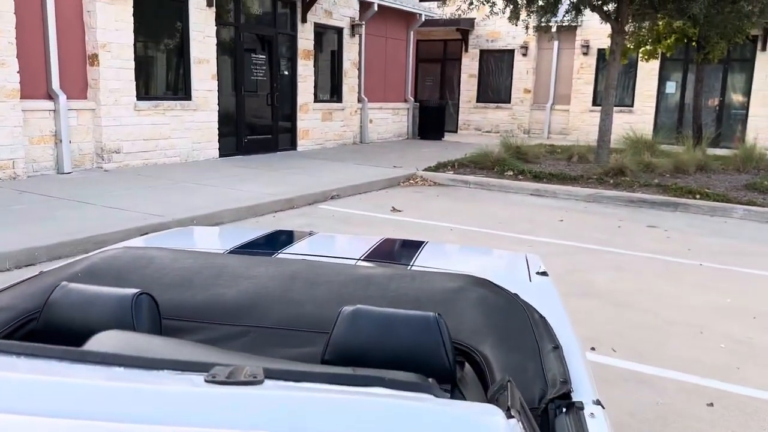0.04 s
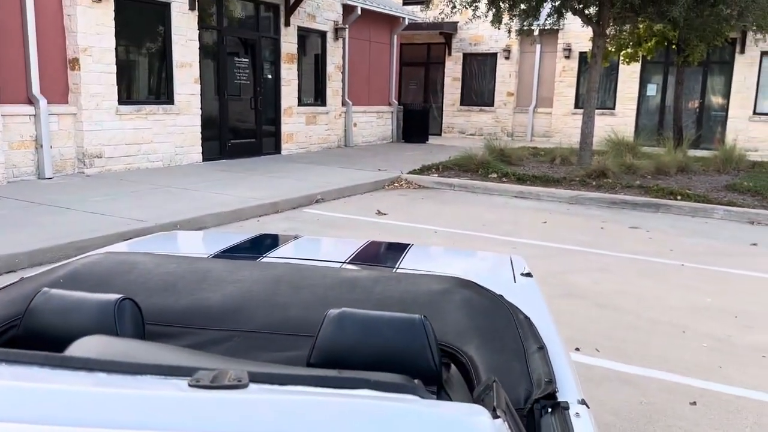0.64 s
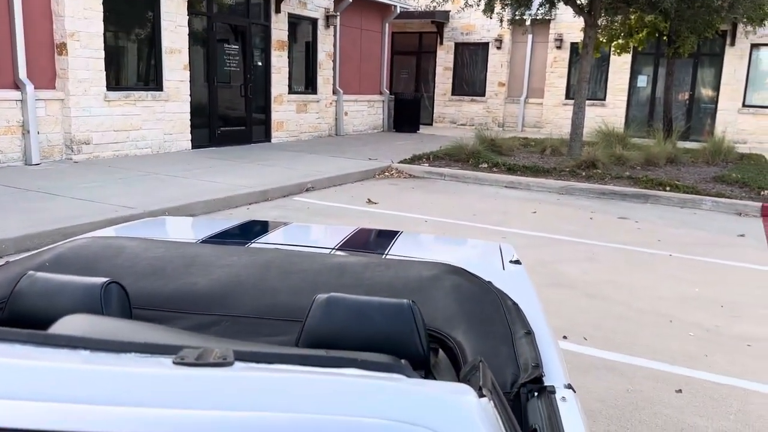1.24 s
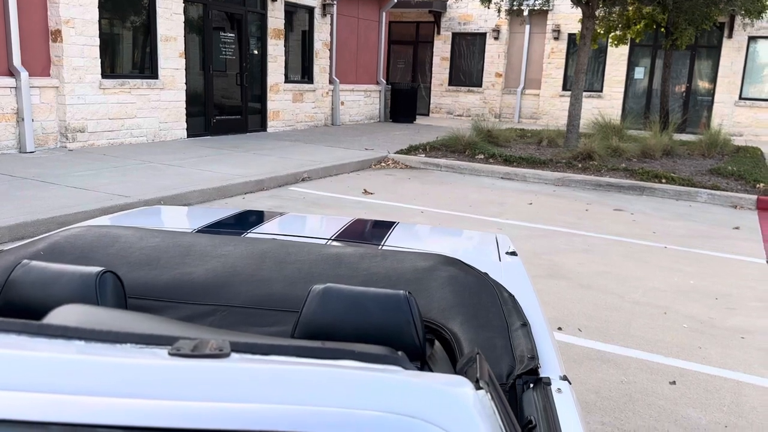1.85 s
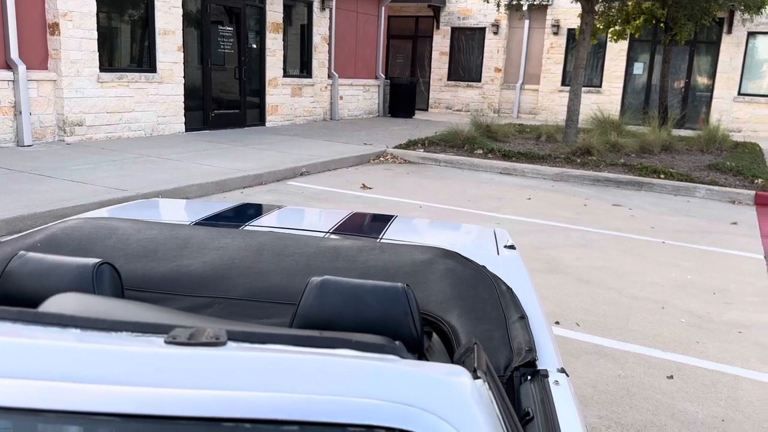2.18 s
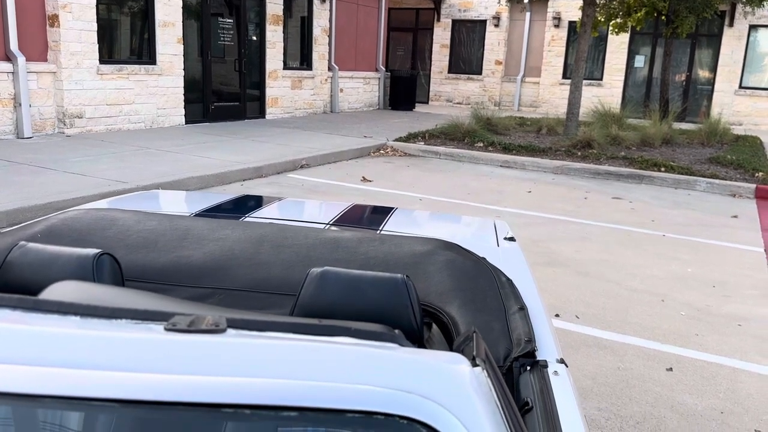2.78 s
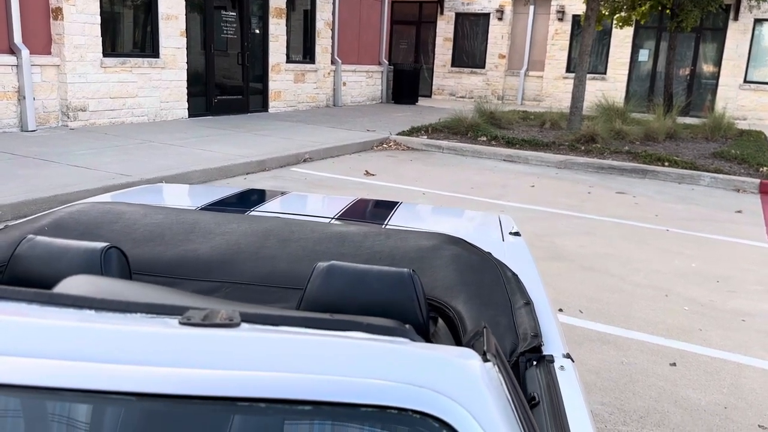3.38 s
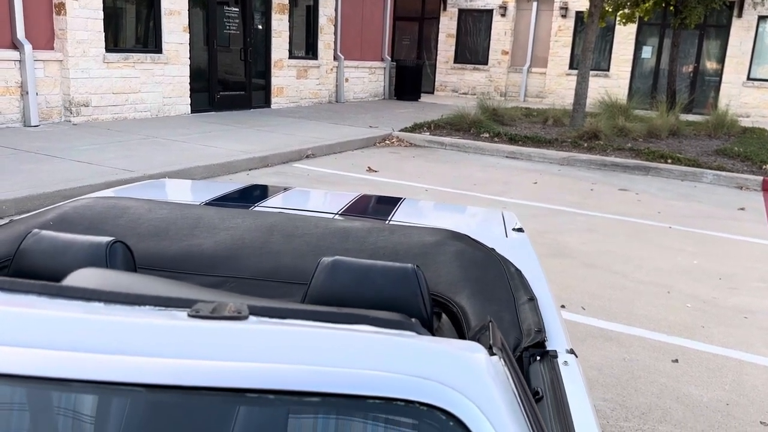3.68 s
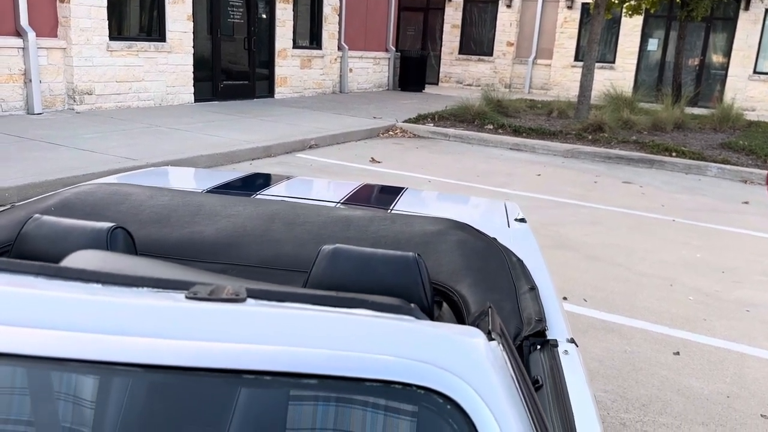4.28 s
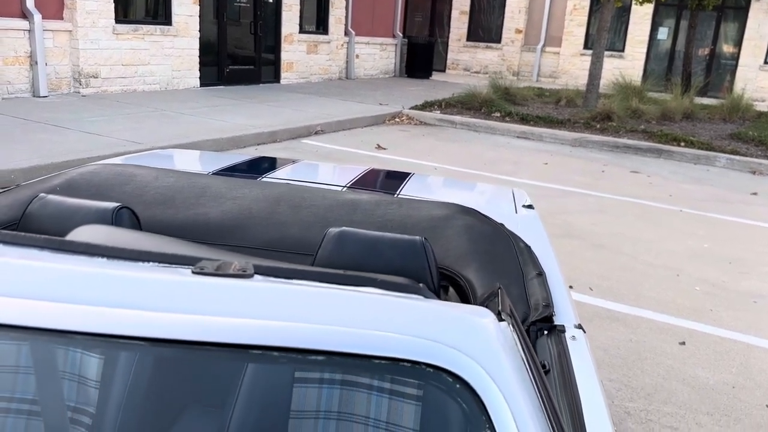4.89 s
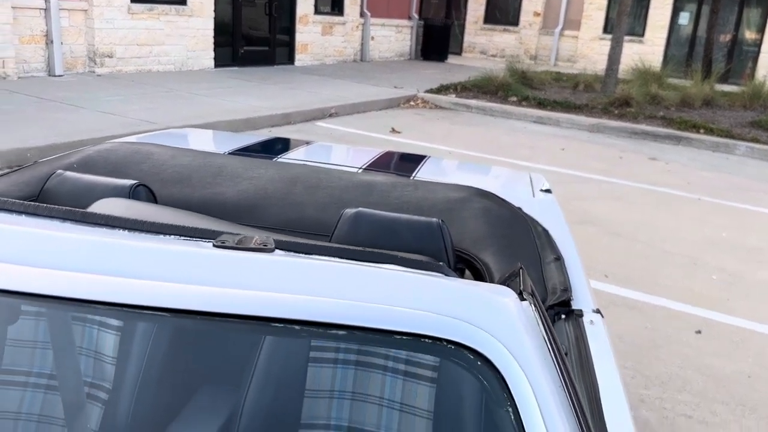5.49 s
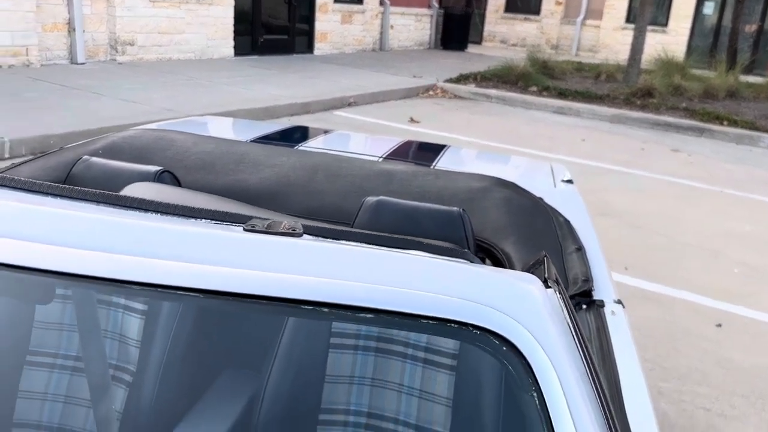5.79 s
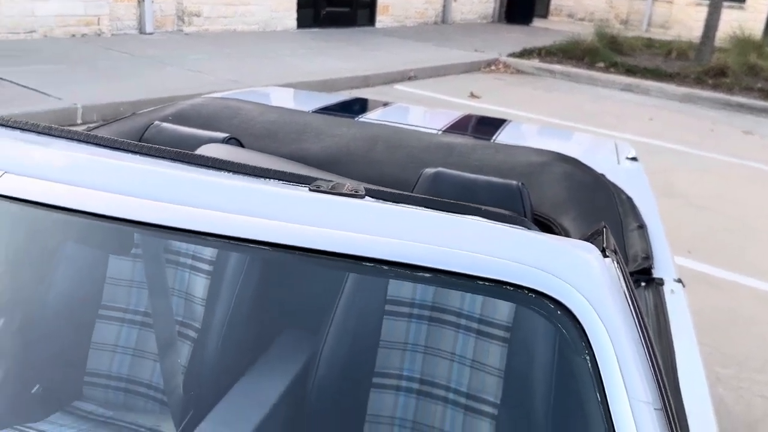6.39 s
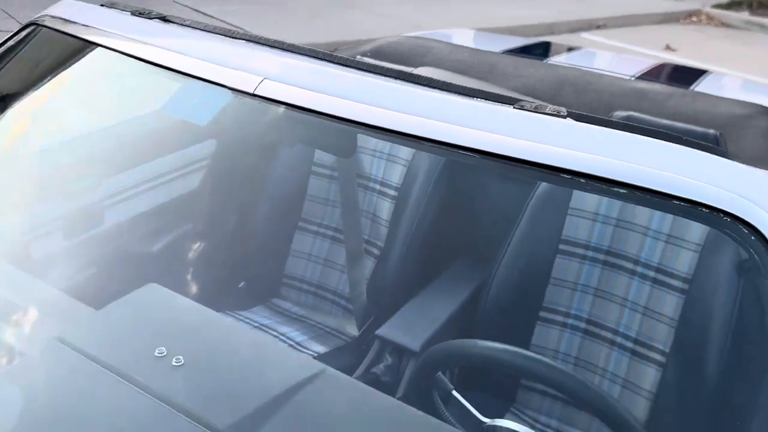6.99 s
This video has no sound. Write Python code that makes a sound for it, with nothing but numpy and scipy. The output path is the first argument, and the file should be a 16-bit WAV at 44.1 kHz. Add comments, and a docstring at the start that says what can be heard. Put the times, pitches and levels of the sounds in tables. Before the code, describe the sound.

A parked convertible's V8 is revved in a parking lot, heard from beside the windscreen. Four quick blips bark from the exhaust, each sinking into a lumpy burble with soft thumps. Fan rush, intake hiss and a whine follow the revs, and the belt gives one brief squeal. The engine falls toward idle, takes two more blips, and the hiss grows at the end.

```python
"""A parked convertible's V8 is blipped six times, heard from beside the windscreen.
Four blips come in the first 4 s: the exhaust barks under throttle, then lopes, burbles and thumps as the
revs sink; a shop front answers. Fan rush, intake hiss and an accessory's whine follow the revs.
The whine swells briefly at 1.2 s, the belt squeals at 2.1 s, the whine swells again at 2.6 s. The engine
falls toward idle, takes two more blips from 5 s on, and the hiss rises as the listener nears the bonnet."""
import sys
import numpy as np
from scipy import signal
from scipy.fft import rfft, irfft, next_fast_len
from scipy.io import wavfile
from scipy.ndimage import uniform_filter1d, minimum_filter1d, map_coordinates

SR = 44100
rng = np.random.default_rng(int(sys.argv[2]) if len(sys.argv) > 2 else 0)


def digitize_waveform(pressure):
    """Quantize a signal to 16-bit integers and store it at the path in sys.argv[1].

    Rows of a 2-D input are taken as channels; values are limited to [-1, 1].
    """
    field = np.atleast_2d(pressure).T
    bounded = np.clip(field, -1, 1)
    quanta = np.round(bounded * 32767).astype(np.int16)
    wavfile.write(sys.argv[1], SR, quanta)


N = 319725
TIME_S = np.arange(N) / SR
CYLINDERS, REV_HZ = 8, 200  # REV_HZ: firing rate at a typical rev

# throttle blips: (opens [s], shut [s], full push [firings/s^2], hiss starts [s], hiss [dB],
#                  load starts [s], load cut [s], bark [dB])
BLIPS = [(0.081, 0.812, 347, 0.26, -30.2, 0.10, 0.79, 1.4),
         (1.404, 1.985, 509, 1.39, -28.3, 1.42, 1.945, 1.5),
         (2.651, 3.053, 391, 2.59, -34.6, 2.69, 3.04, -1.3),
         (3.373, 3.832, 327, 3.35, -34.4, 3.47, 3.78, -2.2),
         (5.154, 5.702, 473, 5.145, -32.6, 5.2, 5.69, -.6),
         (6.13, 6.542, 485, 6.035, -31.8, 6.15, 6.505, 1)]
# exhaust against load: (load [0-1], firing note [dB], bark [dB], burble [dB],
#                        coasting change [dB], drone change [dB])
LOAD = [(0, -42.5, -36.5, -26.5, 1.5, 2), (.15, -23.5, -26, -21, 2, 0.5), (.35, -17, -23.5, -29, 4.5, 5),
        (.55, -18, -19.5, -26.5, -1.5, -6), (1, -20, -16.5, -38, 1, -12)]
# deep note and burble as the listener moves from the tail: (time [s], level [dB])
TAIL_LEVEL = [(0, 2.5), (.5, 2.5), (1.1, 2), (1.6, 1), (2.1, 0), (3.1, -3), (4.3, -2.5), (4.75, -2),
              (5.3, -3), (6.3, -1), (7.25, -1)]


def amp(db):
    """Decibels to gain."""
    return 10 ** (np.asarray(db) / 20)


def unit(x):
    """Scaled to rms 1."""
    return x / np.sqrt(np.mean(x ** 2) + 1e-20)


def along(points, hz):
    """(frequency [Hz], value) points read on a log axis."""
    f, v = np.transpose(points)
    return np.interp(np.log(hz + 1), np.log(f + 1), v)


def lookup(rows, x=TIME_S):
    """Each column after the first, read at x."""
    key, *cols = np.transpose(rows)
    return [np.interp(x, key, c) for c in cols]


def wobble(rate_hz):
    """Smooth random curve, rate_hz knots a second."""
    coarse = np.arange(0, N, 64)
    knots = rng.standard_normal(4096)
    return np.interp(np.arange(N), coarse, map_coordinates(knots, [coarse * rate_hz / SR], mode="wrap"))


def filtered(x, response):
    """x times a complex frequency response."""
    size = next_fast_len(N + SR // 4)
    return irfft(rfft(x, size) * response(np.fft.rfftfreq(size, 1 / SR)), size)[..., :N]


def coloured(x, spectrum):
    """x through (frequency [Hz], level [dB]) points, at rms 1."""
    return unit(filtered(x, lambda hz: amp(along(spectrum, hz))))


def resonate(x, modes):
    """x through (centre [Hz], width [Hz], boost [dB]) resonances."""
    return filtered(x, lambda hz: amp(sum(db / (1 + (2 * (hz - centre) / width) ** 2)
                                          for centre, width, db in modes)))


def rush(spectrum, gate):
    """Gated stereo noise of rms 1, alike in the bass and more diffuse above."""
    coherence = [(130, .995), (300, .92), (620, .42), (900, .7), (1800, .75), (2600, .35), (7500, .3),
                 (10000, .7), (10600, .88)]  # left with right: (frequency [Hz], likeness [0-1])

    def mid_side(hz):
        angle = np.arccos(np.clip(along(coherence, hz), 0, 1)) / 2
        return np.array([np.cos(angle), np.sin(angle)])

    mid, side = filtered(rng.standard_normal((2, N)) * gate, mid_side)
    return coloured(np.array([mid + side, mid - side]), spectrum)


def harmonics(cycle, orders, waver_db, drift_rad):
    """Orders of the four-stroke cycle, each wavering in level and phase."""
    return sum(amp(db + waver_db * wobble(18)) * np.sqrt(2)
               * np.sin(2 * np.pi * (order * cycle + rng.random()) + drift_rad * wobble(15))
               for order, db in orders)


def puffs(cycle, decay_firings, scatter_db):
    """A gate that opens at each firing; the nearer bank's unevenly spaced cylinders are stronger."""
    near_bank = np.array([1, 0, 1, 0, 0, 1, 0, 1])
    firing = cycle * CYLINDERS
    index = firing.astype(int)
    size_db = 4 * near_bank[index % CYLINDERS] + scatter_db * rng.standard_normal(N)[index]
    return unit(amp(size_db) * np.exp(-(firing % 1) / decay_firings))


def crankshaft(start_hz=150.3, idle_hz=34.9, drag_per_s=.64, release_s=.197):
    """Firing rate [Hz]: the throttle pushes it up, drag pulls it toward idle."""
    push = sum(np.interp(TIME_S, [opens, shut - release_s, shut], [0, full, 0])
               for opens, shut, full, *_ in BLIPS)
    fade = np.exp(-drag_per_s * TIME_S)
    return idle_hz + fade * (start_hz - idle_hz + np.cumsum(push / fade) / SR)


def revs_db(firing_hz):
    """Engine speed against a typical rev."""
    return 20 * np.log10(firing_hz / REV_HZ)


def loads(ease_s=.1, eased_to=.46, cut_s=.055):
    """Engine load [0-1], one row per blip: builds, eases, is cut."""
    return np.array([np.interp(TIME_S, [start, cut - cut_s - ease_s, cut - cut_s, cut],
                               [0, 1, eased_to, 0]) for *_, start, cut, _ in BLIPS])


def off_axis(x):
    """Sound from one side reaches the two microphone ports at different levels and phases."""
    tilt = [(100, 1.9), (350, 0.5), (650, 4.5), (950, 1.5), (1200, -1.5), (1800, -3), (6000, 3.5),
            (9000, -0.5)]  # (frequency [Hz], left over right [dB])
    lead = [(40, 0), (300, .2), (680, 1.3), (1100, 1.2), (1450, 1.9), (1650, 2.75), (1950, 3.1),
            (2300, 3.4), (2600, 5.9), (3500, 7.2), (4100, 6.9), (4600, 9.1), (5100, 9.4), (5500, 12),
            (6300, 12), (7000, 13.6), (8100, 15.6), (10500, 12.6)]  # (frequency [Hz], left phase lead [rad])
    sides = np.array([[.5], [-.5]])
    return filtered(x, lambda hz: amp(sides * along(tilt, hz)) * np.exp(1j * sides * along(lead, hz)))


def shop_front(x, delay_s=.03):
    """A late, thin answer from the stone walls."""
    decay = [(150, 0.99), (1500, 0.18), (9000, 0.021)]  # (frequency [Hz], t60 [s])
    hz, t, noise = signal.stft(rng.standard_normal((2, SR // 2)), SR, nperseg=256)
    tail = signal.istft(noise * amp(-60 * t / along(decay, hz)[:, None]), SR, nperseg=256)[1]
    delayed = np.pad(x, ((0, 0), (int(delay_s * SR), 0)))
    return signal.fftconvolve(delayed, tail / np.linalg.norm(tail[0]), axes=1)[:, :N]


def bodywork(x, paths, delays_s=(.002, .016), drift_s=.00004, echo_db=-19):
    """Short echoes off panels and ground comb the sound; their paths drift as the listener moves."""
    out = x.copy()
    for path in range(paths):
        delay_s = rng.uniform(*delays_s) + drift_s * wobble(.52)
        for side in range(len(x)):
            polarity = rng.choice([-1, 1]) ** (path % 2)
            out[side] += polarity * amp(echo_db) * np.interp(TIME_S - delay_s, TIME_S, x[side], left=0)
    return out / np.sqrt(1 + paths * amp(echo_db) ** 2)


def swells_and_squeal(cycle):
    """The accessory's whine swells briefly twice; in between comes one higher belt squeal."""
    tones = [(1.18, .06, -36, 68.4), (2.135, .04, -31, 77.8), (2.64, .06, -41, 68.4)]  # (time [s], half-width [s], level [dB], order)
    flutter_rad = .8 * wobble(28) + .5 * wobble(150)
    return np.sqrt(2) * sum(amp(db) * np.exp(-((TIME_S - at_s) / width_s) ** 2)
                            * np.sin(2 * np.pi * order * cycle + flutter_rad)
                            for at_s, width_s, db, order in tones)


def whine(firing_hz, cycle, order=68.4, growth=4.3, right_db=1.6):
    """A belt-driven accessory sings at a fixed ratio, louder with speed, over fainter pulleys."""
    partials = [(1, 0, 1.7, .18), (2, -15.5, 3.5, 1.1)]  # (harmonic, level [dB], flutter [dB], wander per port [rad])
    pulleys = [(40, -14), (63, -14), (120, -20)]  # (order, level against the whine [dB])
    level = [(0, -32), (.9, -30.5), (1.6, -32.5), (3, -31.5), (3.5, -34), (4.1, -32.5), (4.7, -36),
             (5.6, -36.5), (7.25, -34.5)]  # at a typical rev, as the listener moves: (time [s], level [dB])
    phase = 2 * np.pi * order * cycle + wobble(18) + .5 * wobble(90)
    roughness = amp(2 * wobble(120))
    tone = sum(amp(db + flutter_db * wobble(16))
               * np.sin(k * phase + wander_rad * np.array([wobble(20), wobble(20)]))
               for k, db, flutter_db, wander_rad in partials)
    sound = np.sqrt(2) * roughness * tone + harmonics(cycle, pulleys, waver_db=2.5, drift_rad=.9)
    gain = amp(lookup(level)[0] + growth * revs_db(firing_hz))
    pan = amp(right_db * np.array([[-.5], [.5]]))
    return bodywork(gain * pan * sound, paths=5)


def fan(firing_hz, cycle, growth=2.08):
    """Fan rush grows steeply with speed and chatters at each firing."""
    spectrum = [(60, -27), (200, 0.5), (410, 10), (600, -2.5), (800, 2), (1400, 4.5), (2250, 0.5),
                (2800, -5), (3400, -4.5), (4150, -5.5), (4800, -6), (6500, -7), (8300, -8.5), (10000, -13),
                (12000, -25), (15000, -31)]  # (frequency [Hz], level [dB])
    level = [(0, -21), (.8, -22.5), (1.5, -22.5), (2.1, -24.5), (2.8, -27), (3.8, -27.5), (4.9, -28),
             (5.4, -26.5), (6.5, -25.5), (7.25, -25.5)]  # at a typical rev, as the listener moves: (time [s], level [dB])
    chatter = 1 + .12 * puffs(cycle, decay_firings=.4, scatter_db=3)
    gain = amp(lookup(level)[0] + growth * revs_db(firing_hz) + .64 * wobble(13))
    return gain * rush(spectrum, chatter)


def intake(firing_hz, cycle, attack_s=.1, release_s=.25, linger_s=.088, growth=.67):
    """Air hisses through the open throttle, over the bay's steady hiss."""
    spectrum = [(1500, 0.5), (2200, 3), (2680, 2.5), (3100, -3.5), (5000, -2), (7500, 2.5), (9700, 0.5),
                (10800, -6), (12000, -12.5), (15000, -16)]  # (frequency [Hz], level [dB])
    bonnet_hiss = [(0, -53), (5.2, -47.5), (6.2, -48), (7.25, -37.5)]  # as the listener nears the bonnet: (time [s], level [dB])
    throttle = sum(amp(db) * np.clip((TIME_S - start) / attack_s, 0, 1)
                   * np.clip((shut + linger_s - TIME_S) / release_s, 0, 1)
                   for _, shut, _, start, db, *_ in BLIPS)
    gulps = 1 + .18 * puffs(cycle, decay_firings=.6, scatter_db=2.5)
    gain = throttle * amp(growth * revs_db(firing_hz)) + amp(lookup(bonnet_hiss)[0])
    return gain * rush(spectrum, gulps)


def engine_bay(firing_hz, cycle):
    """Fan and intake echo off the panels and ring the bay."""
    cavities = [(398, 22, 2), (548, 14, 9), (716, 20, 5), (755, 25, 5), (840, 45, 5), (1510, 90, 2.5),
                (1780, 90, 3), (1975, 60, 3.5), (2108, 60, 3.5), (2590, 100, 5), (2790, 110, 5),
                (3090, 80, 3), (3800, 250, 2), (4155, 90, 3.5), (4800, 200, 2), (5650, 150, 2)]  # (centre [Hz], width [Hz], boost [dB])
    air = fan(firing_hz, cycle) + intake(firing_hz, cycle)
    return resonate(bodywork(air, paths=8), cavities)


def thumps(t60_s=.13, attack_s=.024, gain_db=1):
    """Each late-burning charge gives the pipes one soft push, and they ring low."""
    charges = [(0.032, 4.5, 69.6), (0.074, 7, 79), (0.134, 4, 80), (0.783, 0, 102), (1.142, -2, 68),
               (1.323, -4, 87), (1.487, 5.5, 75), (2.526, 3.5, 92), (2.576, -1, 74), (3.018, -11, 80),
               (3.318, 2.5, 94.5), (3.389, 1, 67), (3.453, 4, 88), (3.757, -4, 70.4), (4.025, -3, 91.5),
               (4.085, -6, 56), (4.217, -4, 68), (4.365, -4, 58), (4.585, -3, 66), (4.678, -5, 70),
               (5.7, -6, 66), (7.048, -1, 76.6), (7.19, -1, 66)]  # (time [s], level [dB], ring [Hz])
    out, t = np.zeros(N + SR), np.arange(SR // 4) / SR
    push = amp(-60 * t / t60_s) * (1 - np.exp(-t / attack_s))
    for at_s, db, ring_hz in charges:
        out[round(at_s * SR):][:len(t)] -= amp(db + gain_db) * push * np.sin(2 * np.pi * ring_hz * t)
    return out[:N]


def burble(cycle, level_db, lump_db=3.4, lump_hz=24):
    """Each charge burns stronger or weaker than the mean: a low, lumpy rumble."""
    spectrum = [(20, -42), (40, -28), (62, 11), (88, -1.5), (110, -1), (150, 1.5), (290, -13.5),
                (400, -16.5), (900, -37), (3000, -120)]  # (frequency [Hz], level [dB])
    fired = np.diff(np.floor(cycle * CYLINDERS), prepend=0)
    uneven = fired * np.sign(rng.standard_normal(N)) * amp(2 * rng.standard_normal(N))
    return amp(level_db + lump_db * wobble(lump_hz)) * coloured(uneven, spectrum)


def gas_rasp(firing_hz, cycle, load, rasp_db, blare_db=-29.5, blare_growth=6.3):
    """Gas rasps out at each firing; fast gas blares under load."""
    rasp_spectrum = [(25, -50), (60, -17), (130, -7.5), (190, -2), (270, -6), (315, -12.5), (400, -4.5),
                     (490, -8.5), (640, -6.5), (900, -13), (1250, -9.5), (2000, -21), (4000, -26.5),
                     (10000, -40.5)]  # (frequency [Hz], level [dB])
    blare_spectrum = [(300, -29), (600, 0.5), (800, 3), (1250, -1), (2000, -11), (5000, -43)]  # (frequency [Hz], level [dB])
    gas = 1 + puffs(cycle, decay_firings=.9, scatter_db=1.8)
    rasp = amp(rasp_db) * rush(rasp_spectrum, gas)
    return rasp + load * amp(blare_db + blare_growth * revs_db(firing_hz)) * rush(blare_spectrum, gas)


def deep_note(firing_hz, cycle, load):
    """Firing note, lope of the uneven banks, drone, body boom and air pumped by the pistons."""
    firing = [(7, -12.5), (8, 0.5), (9, -16), (10, -13)]  # (order, level [dB])
    lope = [(2, -32), (3, -12), (4, -9.5), (5, -0.5)]  # (order, level [dB])
    pumping = [(2, -35), (3, -30), (4, -32), (7, -33), (10, -38), (13, -45), (16, -48)]  # (order, level [dB])
    # pipes against speed: (firing rate [Hz], coasting note [dB], lope [dB], drone [dB],
    #                       loaded note change [dB])
    pipe_response = [(106.4, -14, -33, -40, 9), (121, -31, -19, -18.5, 5), (134, -39, -38, -12.5, -16),
                     (151.2, -23.5, -24, -18.5, -19), (166.3, -24, -21.5, -30.5, -10.5),
                     (180, -27, -27.5, -25, 0), (210.8, -45, -23, -29, 2.5), (213.6, -26, -22, -36, 0.5),
                     (226, -25.5, -17, -18.5, -27), (248, -24, -19, -42, -9)]
    body_boom = (230, 12, -18)  # when coasting: (firing rate [Hz], width [Hz], level [dB])
    firing_db, _, _, coast_trim_db, drone_trim_db = lookup(LOAD, load)
    coast_db, lope_db, drone_db, firing_trim_db = lookup(pipe_response, firing_hz)
    boom_hz, width_hz, boom_db = body_boom
    firing_gain = amp(firing_db + firing_trim_db) + amp(coast_db + coast_trim_db)
    boom_gain = amp(boom_db) * (1 - load) ** 2 * np.exp(-((firing_hz - boom_hz) / width_hz) ** 2)
    note = firing_gain * harmonics(cycle, firing, waver_db=1.5, drift_rad=.055)
    note += amp(lope_db + coast_trim_db) * harmonics(cycle, lope, waver_db=2.6, drift_rad=.13)
    note += amp(drone_db + drone_trim_db) * harmonics(cycle, [(6, 0)], waver_db=.7, drift_rad=.1)
    note += boom_gain * harmonics(cycle, [(2, 0)], waver_db=5, drift_rad=.1)
    note += (firing_hz / 190) ** 1.2 * harmonics(cycle, pumping, waver_db=3, drift_rad=.55)
    return amp(lookup(TAIL_LEVEL)[0]) * note


def exhaust(firing_hz, cycle, bark_growth=1.1):
    """Deep note and bark pass the silencer and, with the rasp, ring the tailpipes over the burble."""
    bark = [(7, -20), (10, -10), (11, -1.5), (13, -6), (14, -11), (15, -8.5), (16, -5.5), (18, -8),
            (19, -9), (22, -14)]  # (order, level [dB])
    silencer = [(25, -30), (42, -8), (56, -3), (280, -0.5), (320, -14.5), (395, 0), (460, -2.5),
                (560, -0.5)]  # (frequency [Hz], gain [dB])
    pipe_modes = [(234, 8.8, 4.5), (355, 27, 5.5), (405.5, 12, 1.5), (485, 20, 3), (542, 7.8, -11)]  # standing waves: (centre [Hz], width [Hz], boost [dB])
    blip_loads = loads()
    load = blip_loads.sum(axis=0)
    _, bark_db, burble_db, *_ = lookup(LOAD, load)
    bark_db += np.transpose(BLIPS)[-1] @ blip_loads
    bark_db += bark_growth * np.minimum(revs_db(firing_hz), 0)
    note = deep_note(firing_hz, cycle, load)
    note += amp(bark_db) * harmonics(cycle, bark, waver_db=2, drift_rad=.16)
    muffled = filtered(note, lambda hz: amp(along(silencer, hz)))
    rasp = gas_rasp(firing_hz, cycle, load, rasp_db=bark_db - 4)
    return resonate(muffled + rasp, pipe_modes) + burble(cycle, burble_db + lookup(TAIL_LEVEL)[0])


def scene():
    """One crankshaft drives exhaust, bay and belt; the car stands to one side of the microphone."""
    firing_hz = crankshaft()
    cycle = np.cumsum(firing_hz) / SR / CYLINDERS  # four-stroke cycles elapsed
    pipes = exhaust(firing_hz, cycle) + thumps()
    echo = amp(-29) * shop_front(pipes)
    car = pipes + echo + engine_bay(firing_hz, cycle) + whine(firing_hz, cycle)
    return off_axis(car) + swells_and_squeal(cycle)


def record(dry):
    """Microphone low cut, peak limiter, band limit."""
    low_cut_hz, ceiling, top_hz = 36, .93, 15200
    dry = signal.sosfilt(signal.butter(3, low_cut_hz, "highpass", fs=SR, output="sos"), dry)
    needed = np.minimum(1, ceiling / (np.abs(dry).max(axis=0) + 1e-9))
    gain = uniform_filter1d(minimum_filter1d(needed, size=801), size=801)
    return filtered(dry * gain, lambda hz: hz < top_hz)


dry = scene()
out = record(dry)
digitize_waveform(out)
```